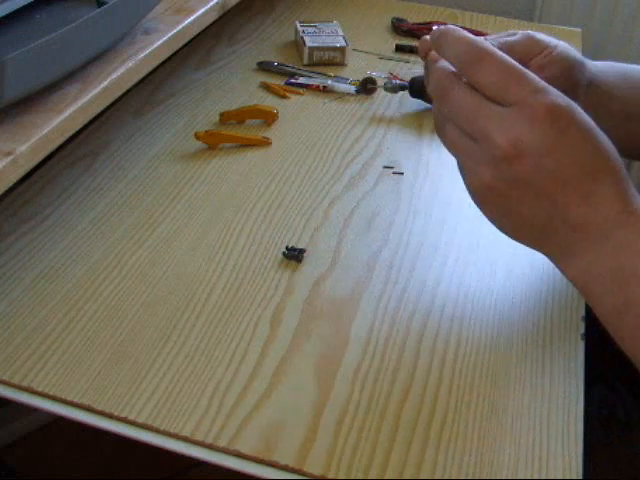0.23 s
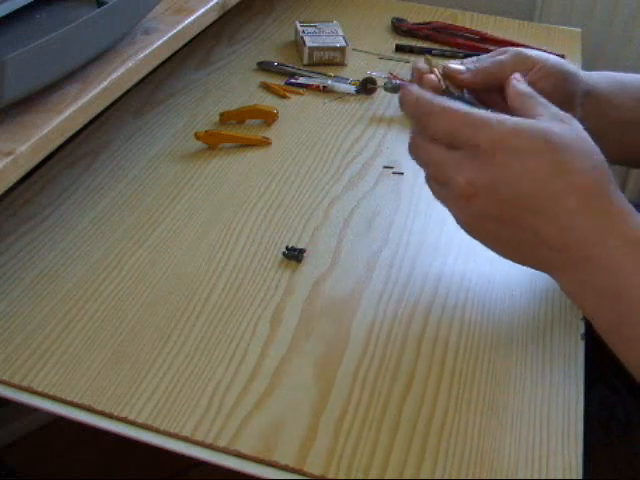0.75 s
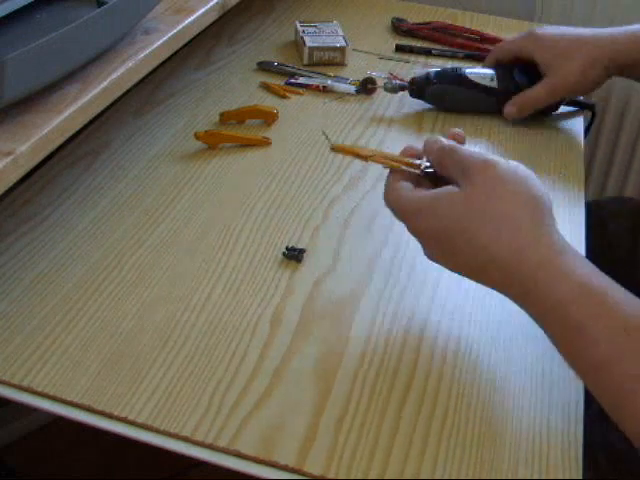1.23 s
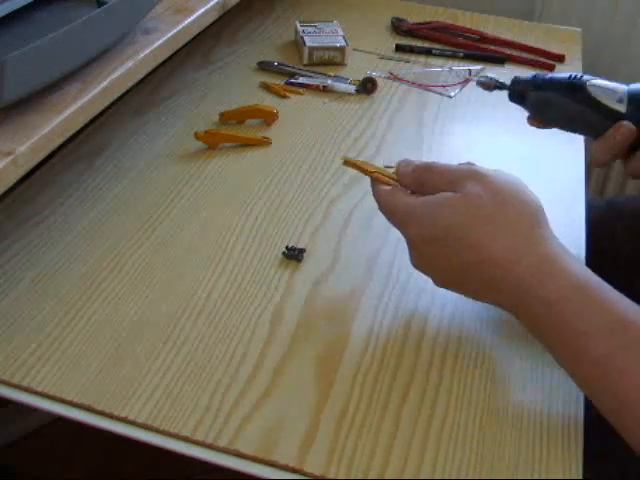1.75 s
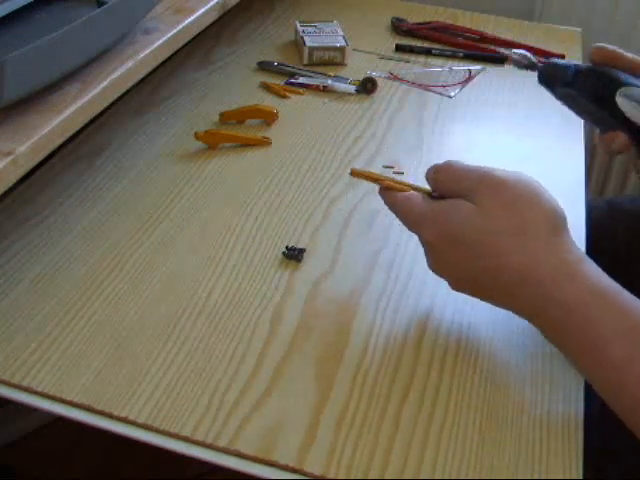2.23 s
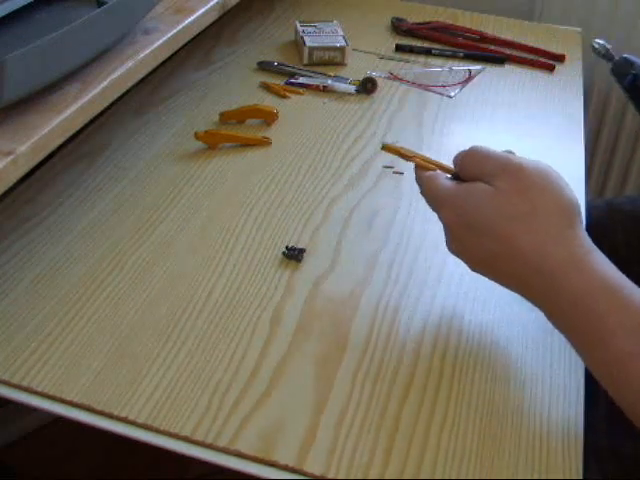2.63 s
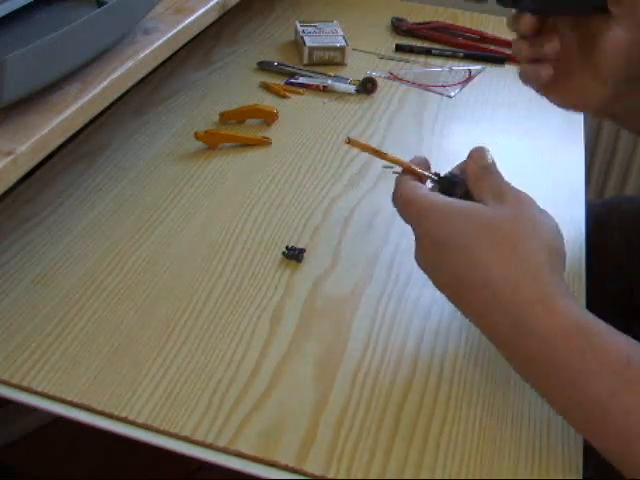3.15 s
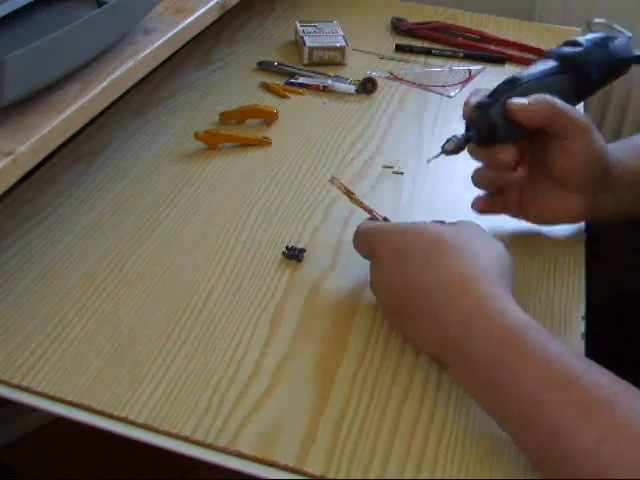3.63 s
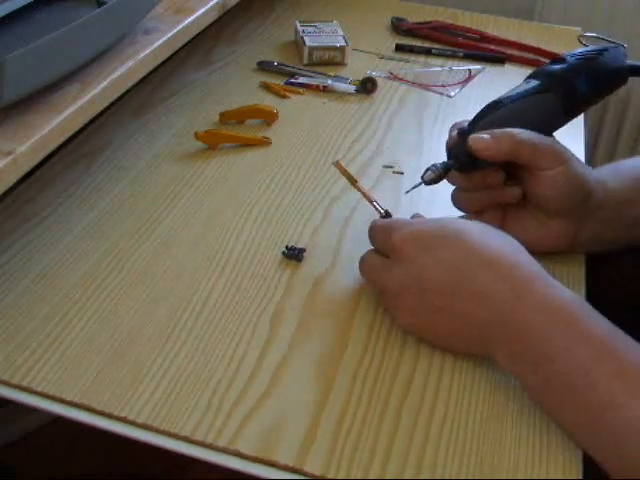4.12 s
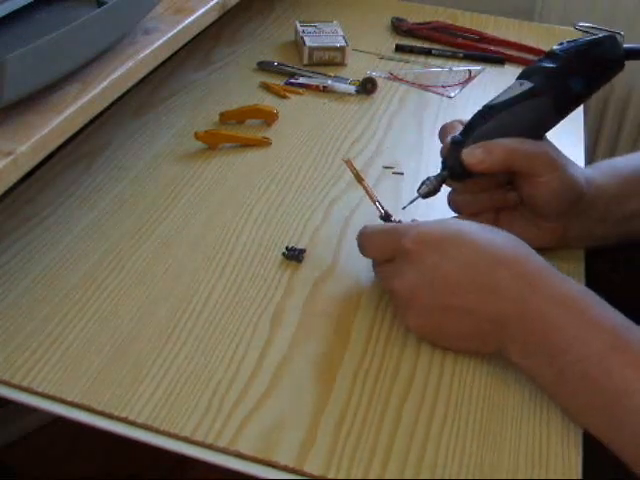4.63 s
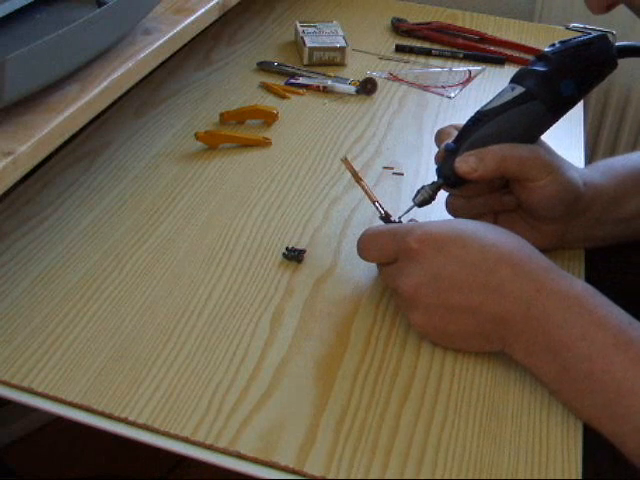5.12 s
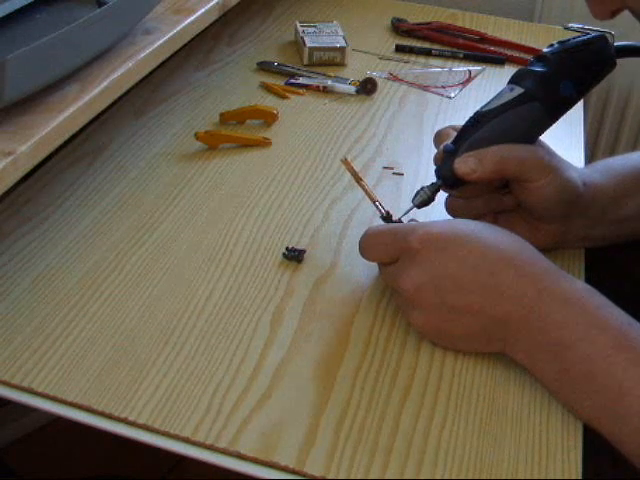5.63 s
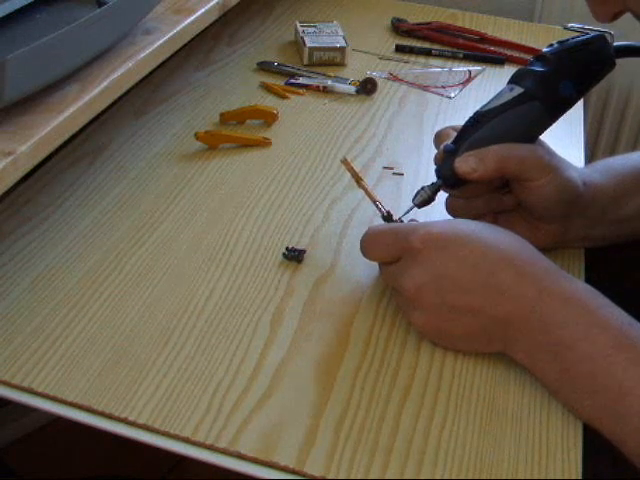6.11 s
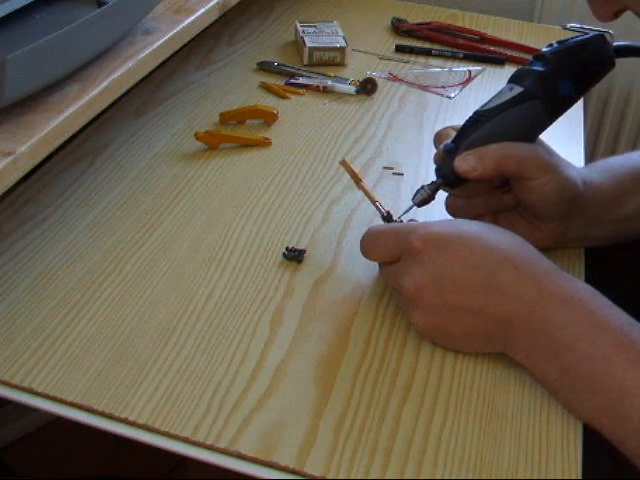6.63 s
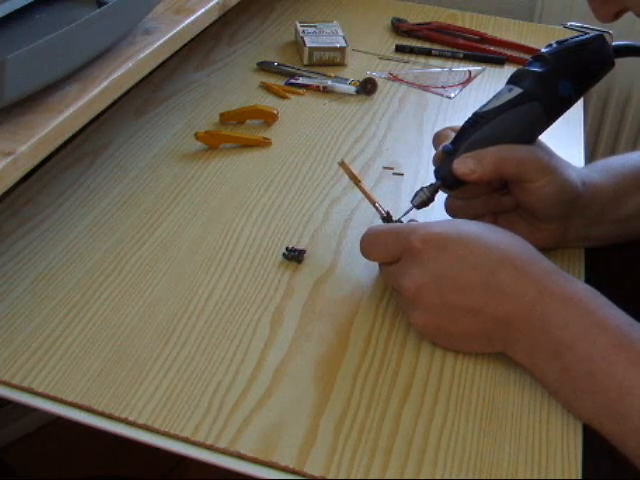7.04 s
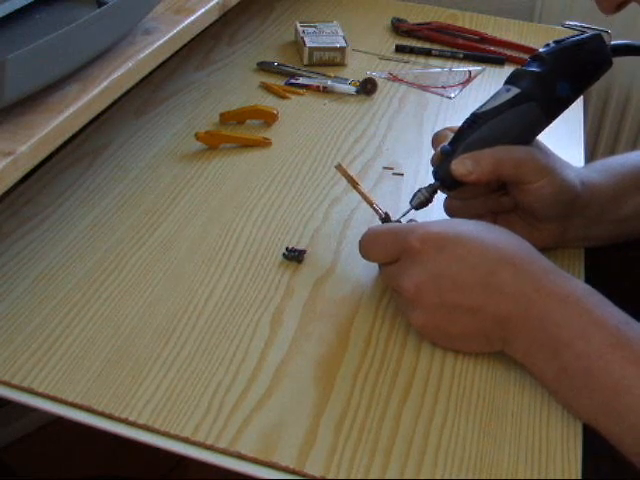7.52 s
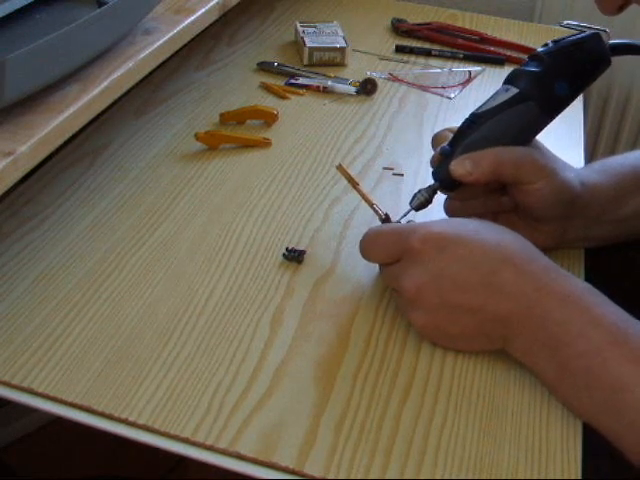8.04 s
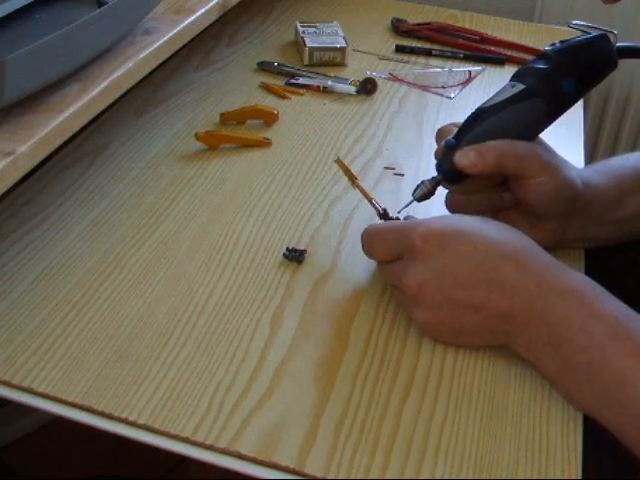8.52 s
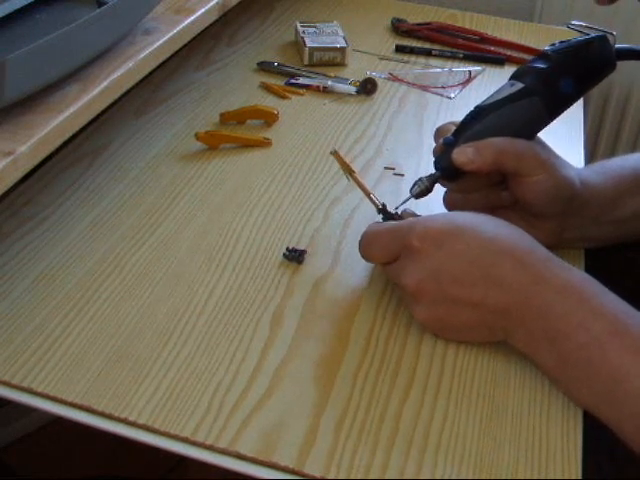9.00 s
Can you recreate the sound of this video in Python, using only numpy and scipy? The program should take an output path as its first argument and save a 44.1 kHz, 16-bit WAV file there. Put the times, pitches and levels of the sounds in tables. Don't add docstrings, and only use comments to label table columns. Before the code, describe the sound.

At a wooden desk, faint finger squeaks and a few light knocks sit over soft microphone hiss. A small rotary tool clicks on and its whine climbs quickly to a steady, airy high pitch. After a few seconds the bit touches a small part with fine hissing grazes, then harder buzzing, scraping presses that drag the pitch down. Between bites it recovers and ends running free. Close, plain mono camera microphone in a small room.

```python
import sys
import numpy as np
from scipy import signal
from scipy.fft import rfft, irfft, next_fast_len
from scipy.io import wavfile
from scipy.ndimage import uniform_filter1d

SR = 44100
rng = np.random.default_rng(int(sys.argv[2]) if len(sys.argv) > 2 else 0)


def gain_from_db(level_db):
    decades = np.asarray(level_db, float) / 20
    return 10 ** decades


def unload_audio(sound):
    columns = np.transpose(np.atleast_2d(sound))
    steps = np.round(np.clip(columns, -1, 1) * 32767)
    wavfile.write(sys.argv[1], SR, steps.astype(np.int16))


N = 408366
T = np.arange(N) / SR
CONTROL_STEP = 64
TOP_HZ = 531.8
CAGE = .3762
DEEP_DRAG = 130
TONE_LIMIT_HZ = 15600

# start_s, end_s, chips_db, wobble_db, scrape_db
TOUCHES = [(5.62, 5.65, -37, -65, -57), (5.68, 5.74, -33, -65, -52), (5.9, 5.97, -30, -63, -49),
           (6.0, 6.04, -25.5, -51.5, -54), (6.23, 6.31, -36.5, -63, -53), (6.43, 6.53, -27.5, -61, -46),
           (6.54, 6.68, -38, -51, -47.5), (6.69, 6.725, -26.5, -46, -42.5), (6.96, 7.03, -24.5, -49, -48),
           (7.04, 7.19, -22, -41.5, -47), (7.2, 7.26, -21.5, -45, -44), (7.278, 7.3, -21, -44, -47),
           (7.31, 7.33, -26, -39.5, -49), (7.337, 7.355, -20.5, -36.5, -42), (7.37, 7.43, -35, -38, -59),
           (7.44, 7.515, -28, -46.5, -56), (7.53, 7.57, -29, -38, -54), (7.585, 7.61, -28.5, -40, -54),
           (7.62, 7.65, -24.5, -39, -50), (7.668, 7.692, -22.5, -33.5, -38),
           (8.0, 8.025, -21.5, -56, -37.5), (8.04, 8.06, -20, -43, -41), (8.075, 8.13, -27.5, -42.5, -57),
           (8.155, 8.2, -33.5, -32, -54), (8.22, 8.25, -36, -23.5, -46), (8.25, 8.275, -39, -35, -23),
           (8.293, 8.325, -32, -25, -18), (8.34, 8.355, -33.5, -35, -29), (8.37, 8.43, -38.5, -44, -43.5),
           (8.44, 8.455, -30, -42, -46), (8.882, 8.9, -28.5, -64, -39.5)]
# freq_hz, level_db (per Hz)
CHIPS = [(5000, -19.5), (7500, -2), (9000, 1.5), (10300, 5.5), (11300, 2), (12800, -1), (15500, -2)]


def evened(x):
    return x / np.sqrt(np.mean(x ** 2) + 1e-20)


def columns(rows, outside=None):
    s, *rest = np.transpose(rows)
    return [np.interp(T, s, c, outside, outside) for c in rest]


def spans(rows, rise_db_per_s, fall_db_per_s):
    t = T[::CONTROL_STEP]
    start, end, *levels = np.array(rows)[:, :, None].transpose(1, 0, 2)
    away_db = rise_db_per_s * np.maximum(start - t, 0) + fall_db_per_s * np.maximum(t - end, 0)
    return [np.interp(T, t, np.maximum((db - away_db).max(axis=0), -120)) for db in levels]


def swells(rows):
    t = T[::CONTROL_STEP]
    bells_db = sum(db * np.exp(-((t - s) / half_width_s) ** 2) for s, half_width_s, db in rows)
    return np.interp(T, t, bells_db)


def drift(rate_hz, t=T):
    knots = np.arange(-1, N / SR * rate_hz + 2) / rate_hz
    return 1.15 * np.interp(t, knots, rng.standard_normal(len(knots)))


def noise(spectrum, size=N, gate=1):
    padded = next_fast_len(size)
    hz = np.fft.rfftfreq(padded, 1 / SR)
    f, db = np.transpose(spectrum)
    colour = gain_from_db(np.interp(np.log(hz + 1), np.log(f), db))
    white = rng.standard_normal(size) * gate
    return evened(irfft(rfft(white, padded) * colour, padded)[:size])


def ring(hz, width_hz):
    b, a = signal.iirpeak(hz, hz / width_hz, SR)
    once = signal.lfilter(b, a, rng.standard_normal(N))
    return evened(signal.lfilter(b, a, once))


def resonate(x, hz, width_hz):
    carrier = np.exp(2j * np.pi * np.cumsum(hz * np.ones(len(x))) / SR)
    r = np.exp(-np.pi * width_hz / SR)
    base = signal.lfilter([(1 - r) ** 2], [1, -2 * r, r * r], x / carrier)
    return 2 * (carrier * base).real


def tone(turns, hz, order, db, waver_db, slip=1):
    slow = slice(None, None, CONTROL_STEP)
    level = gain_from_db(db[slow] + waver_db * drift(13.0, T[slow]))
    level = level * (order * hz[slow] < TONE_LIMIT_HZ)
    sine = np.cos(2 * np.pi * (order * turns + slip * rng.random()))
    return np.sqrt(2) * np.repeat(level, CONTROL_STEP)[:N] * sine


def shaft(drag):
    switch_s, step_s, pull_hz = 2.1127, .002, 534.35
    gain_per_s, gain_per_hz, gain_cap_hz = 1.989, .004045, 276
    warm_s, warm_gain = 7, 1.128
    t = np.arange(switch_s, N / SR + .01, step_s)
    hz = [0.]
    for s, load in zip(t, np.interp(t, T, drag)):
        behind_hz = pull_hz - hz[-1]
        warm = warm_gain if s > warm_s else 1
        gain = gain_per_s * warm + gain_per_hz * min(behind_hz, gain_cap_hz)
        hz.append(min(hz[-1] + step_s * (gain * behind_hz - load), TOP_HZ))
    return np.maximum(np.interp(T, t, hz[:-1]), 30)


def motor_levels(hz, drag):
    # time_s, nearness_db, vents_db (extra brush hiss, brightest while the bit touches at 6.5
    # to 6.72 s), grip_db (whine let out)
    hold = [(2.12, 15.5, -9, -4), (2.3, 12.5, -2, 13), (2.45, 7.5, -2.5, -2), (2.8, 4.5, -3, 4),
            (3.1, 3.5, 1.5, 5.5), (3.35, 3.5, 0, 6.5), (3.5, 3, 8, 2), (3.65, 3.5, -2, 5.5),
            (4.1, 1.5, 0, 5), (4.4, 0.5, 4, 2), (4.8, -.5, 4.5, -2), (5.4, 0.9, 3, -3), (6.44, 1, 5.5, -2),
            (6.5, -4, 14, -3), (6.72, -4, 12, -3), (6.77, 0.5, 1, 0), (7.9, 1.5, -5, -1.5),
            (9.25, 2.1, -1, 3)]
    # time_s, half_width_s, gain_db
    swells_8 = [(2.27, .04, 22), (2.79, 0.045, 5), (2.92, 0.11, 9), (3.09, 0.089, 17), (3.33, 0.055, 0),
                (3.5, 0.081, 8), (4.25, 0.25, -1), (6.6, 0.082, -8)]
    # time_s, half_width_s, gain_db
    swells_16 = [(4.2, 0.054, 3.5), (6.5, 0.28, -12), (8.05, .05, 4)]
    # time_s, half_width_s, gain_db
    swells_slots = [(2.75, 0.13, 8.6), (3.1, 0.053, 6.5), (3.5, 0.049, 6.3), (3.8, 0.048, 5.3),
                    (4.1, .06, 4), (5.7, .1, 7.4), (6.6, .12, 5), (7.15, 0.21, 11), (7.55, .1, 6),
                    (7.9, 0.15, 14), (8.2, 0.046, 8), (9.0, 0.27, 10)]
    near, bright, grip = columns(hold)
    missing = 1 - hz / TOP_HZ
    choke = np.clip(drag / 250, 0, 1)
    chips = np.clip((spans(TOUCHES, 180, 200)[0] + 42) / 10, 0, 1)
    labour_db = chips * np.clip(drag / DEEP_DRAG, 0, 1)
    air_db = -34.5 + near + labour_db - 33.5 * missing
    brush_db = -35 + near + bright + 2.6 * labour_db - 20.5 * missing
    eight_db = -.5 + 0.59 * grip + swells(swells_8) + 0.45 * labour_db - 18 * choke - 118 * missing
    sixteen_db = -.6 + 0.45 * grip + swells(swells_16) - 7 * choke - 98 * missing
    slots_db = -3.5 + 0.92 * grip + swells(swells_slots) - 31 * missing
    other_db = 1 + grip - 4.5 * labour_db - 90 * missing
    return air_db, brush_db, eight_db, sixteen_db, slots_db, other_db


def beside(turns, hz, order, full_db, slow_db, db, count):
    below = np.clip((525 - hz) / 35, 0, 1)
    out = np.zeros(N)
    for j, (full, slow) in enumerate(zip(full_db, slow_db), -count):
        level_db = full + below * (slow - full) + db
        out += tone(turns, hz, order + j * CAGE, level_db, 2.4, slip=0.43)
    return out


def commutator_whine(turns, hz, eight_db, sixteen_db):
    fan_8 = [-58, -53, -45, -43, -38.5, -39.5, -50, -57]
    slow_8 = [-58, -51, -42, -44, -42, -42, -42.5, -43]
    fan_16 = [-76, -50, -42.5, -38.5, -33.5, -40, -45]
    slow_16 = [-80, -62, -47, -37.5, -36.5, -35, -36]
    out = beside(turns, hz, 8., fan_8, slow_8, eight_db, count=2)
    return out + beside(turns, hz, 16., fan_16, slow_16, sixteen_db, count=4)


def shaft_orders(turns, hz, slots_db, other_db):
    # order, level_db (rms)
    upper_orders = [(18, -48), (18.79, -49), (19, -52), (20, -45.5), (21, -48), (22, -47), (23, -46),
                    (23.23, -53), (24, -40), (25, -44.5), (25.16, -50), (26, -45.5), (27, -37.5),
                    (28, -39.5), (28.18, -45), (29, -39.5), (30, -48), (31, -54), (32, -49)]
    # order, level_db (rms)
    hum = [(1, -58), (2, -59.5), (2.554, -56)]
    # time_s, half_width_s, gain_db
    swells_18 = [(3.7, .7, 4.7)]
    # time_s, half_width_s, gain_db
    swells_top = [(3.6, 0.73, -5)]
    low_db, top_db = swells(swells_18), swells(swells_top)
    flicker_db = 2.2 + 2.5 * (hz[::CONTROL_STEP] < 529)
    out = np.zeros(N)
    for k, db in upper_orders:
        if k % 8 == 0:
            out += tone(turns, hz, k, db + slots_db, 1.3)
            continue
        swell_db = low_db if k == 18 else top_db if k > 26 else 0
        out += tone(turns, hz, k, db + other_db + swell_db, flicker_db)
    for k, db in hum:
        out += tone(turns, hz, k, db + 110 * np.log10(hz / 531), 1.8)
    return out


def air_and_brushes(turns, air_db, brush_db):
    # freq_hz, level_db (per Hz)
    air_colour = [(120, -58), (200, -29), (528, -19.5), (1170, -14.5), (1330, -12), (3690, -3), (4760, -5),
                  (6400, -4.5), (8310, -9), (9000, -6), (11700, -22), (19800, -120)]
    # freq_hz, level_db (per Hz)
    brush_colour = [(5000, -35.5), (7000, -31), (8300, -4.5), (9500, -12), (11200, -8), (12900, -2.5),
                    (14200, -6), (15500, -7)]
    beat = 1 + 0.14 * np.cos(2 * np.pi * turns) + 0.01 * np.cos(2 * np.pi * CAGE * turns)
    air = gain_from_db(air_db + 1.04 * drift(13.0)) * noise(air_colour, gate=beat)
    return air + gain_from_db(brush_db + 1.9 * drift(8.0)) * noise(brush_colour, gate=beat)


def brush_bounce(hz, brush_db):
    # freq_hz, gain_db
    flare = [(1500, -14), (3900, -24), (4400, -3.5), (4850, 2.5), (5450, -3.5), (6100, 2), (8700, 3.5),
             (11000, 6.5), (13800, 13.5)]
    change = uniform_filter1d(np.gradient(hz), 2000) * SR / 450
    bounce = np.clip(change, 0, 1) + np.clip(-change, 0, 1)
    bounce = uniform_filter1d(bounce, 2500)
    bounce = np.maximum(bounce, np.clip((340 - hz) / 40, 0, 1))
    out = np.zeros(N)
    for order, db in [(16, 2.5), (24, -2.0), (32, -8.0), (40, -12.5)]:
        band_hz = np.minimum(order * hz, 15900)
        band = evened(resonate(rng.standard_normal(N), band_hz, 850.))
        out += gain_from_db(brush_db + db + np.interp(band_hz, *np.transpose(flare))) * bounce * band
    return out


def housing(air_db):
    # freq_hz, width_hz, level_db
    shell = [(2312, 360, -14), (3900, 320, -32), (4820, 200, -12.5), (5900, 550, -18), (1330, 150, -37.5)]
    # time_s, ring_db, chirp_db (bearing)
    starting = [(2.12, -60, -48), (2.17, -48, -37.5), (2.24, -42, -39), (2.28, -37.5, -55),
                (2.36, -36.5, -60), (2.44, -42, -58), (2.47, -46, -44), (2.51, -59, -65), (2.7, -62, -70)]
    ring_db, chirp_db = columns(starting, -120)
    rings = [gain_from_db(db) * ring(f, w) for f, w, db in shell]
    out = gain_from_db(air_db) * sum(rings)
    out += gain_from_db(ring_db + 8.5) * (rings[0] + rings[2] + 3 * rings[4])
    return out + gain_from_db(chirp_db + 27.0) * rings[1]


def motor(turns, hz, drag):
    air_db, brush_db, eight_db, sixteen_db, slots_db, other_db = motor_levels(hz, drag)
    out = commutator_whine(turns, hz, eight_db, sixteen_db)
    out += shaft_orders(turns, hz, slots_db, other_db)
    out += air_and_brushes(turns, air_db, brush_db)
    out += brush_bounce(hz, brush_db)
    out += housing(air_db)
    return out * np.clip((T - 2.11) / 0.031, 0, 1)


def strikes(turns, hz, count):
    # freq_hz, level_db
    strike_colour = [(1400, 3), (2000, 3), (2650, -9), (3450, 6), (4400, 1), (5800, -8), (10200, 0),
                     (15500, -5)]
    at = np.arange(len(hz))
    coarse = np.arange(0, len(hz) + 700, 700)
    out = np.zeros(len(hz))
    for k, flutter in enumerate(rng.standard_normal((count, len(coarse))), 3):
        depth_db = min(1.5 + .3 * k, 5)
        db = np.interp(k * hz, *np.transpose(strike_colour)) + depth_db * np.interp(at, coarse, flutter)
        out += gain_from_db(db) * (k * hz < TONE_LIMIT_HZ) * np.cos(2 * np.pi * (k * turns + rng.random()))
    return out


def wobble(turns, hz, drag, first_db, force_db, judder_db):
    shallow_db = -13.5 * np.clip(1 - drag / DEEP_DRAG, 0, 1)
    second_db = np.minimum(-43.5 + 0.47 * (first_db + 38) + shallow_db, first_db + 5)
    strike_db = -40 + shallow_db - 19 * (1 - hz / TOP_HZ)
    strike_db += 0.3 * force_db + 2 * np.minimum(force_db + 14.5, 0) + 0.25 * judder_db
    out = tone(turns, hz, 1, first_db, 0.22) + tone(turns, hz, 2, second_db, 0.79)
    contact = strike_db > -70
    out[contact] += gain_from_db(strike_db[contact]) * strikes(turns[contact], hz[contact], count=34)
    return out


def chips_and_scrape(turns, chip_db, scrape_db):
    # freq_hz, width_hz, level_db
    shank = [(10150, 710, -8.5), (12100, 450, -7.5), (13150, 400, -6)]
    # freq_hz, level_db (per Hz)
    scrape_colour = [(150, -62), (400, -7), (500, -5.5), (1200, 1), (2100, -2), (4900, 0), (10600, -11.5),
                     (15500, -31)]
    pulse = 1 + .5 * np.cos(2 * np.pi * turns)
    grains = gain_from_db(1.0 * drift(400.) + 2.0 * drift(45.))
    singing = grains * sum(gain_from_db(db) * ring(f, w) for f, w, db in shank)
    chips = evened(noise(CHIPS, gate=pulse * grains) + singing)
    scrape = noise(scrape_colour, gate=pulse ** 3 * grains) + gain_from_db(-9.0) * ring(5120, 160)
    return gain_from_db(chip_db) * chips + gain_from_db(scrape_db) * scrape


def cutting(turns, hz, drag):
    # time_s, half_width_s, gain_db
    judders = [(7.05, .02, 4), (7.15, 0.01, 5), (7.195, 0.0064, 9), (7.215, 0.0059, 2), (7.235, 0.0058, 7),
               (7.26, 0.0067, 8), (7.287, 0.0086, 9), (7.322, 0.0065, 12), (7.345, 0.017, 11),
               (7.44, .015, 0), (7.56, .015, 6), (8.012, .008, 8), (8.05, 0.0078, 7.5)]
    # freq_hz, width_hz, gain_db
    board = [(270, 7.5, -9), (347, 22, 3), (554, 23.4, 9)]
    # freq_hz, width_hz, level_db
    chatter = [(1440, 20, -44), (1960, 20, -42.5), (3480, 70, -37.5)]
    # time_s, level_db
    bite = [(6.96, -40), (7.0, -5), (7.15, -2), (7.3, -5), (7.37, -6), (7.41, -36), (7.99, -43),
            (8.01, -4.5), (8.08, -3), (8.12, -36)]
    chip_db, first_db, scrape_db = spans(TOUCHES, 584, 479)
    force_db = np.maximum(chip_db, scrape_db) + 22
    judder_db = swells(judders)
    out = wobble(turns, hz, drag, first_db, force_db, judder_db)
    out += chips_and_scrape(turns, chip_db, scrape_db)
    out += sum(gain_from_db(db) * signal.lfilter(*signal.iirpeak(f, f / w, SR), out) for f, w, db in board)
    flex = sum(gain_from_db(db) * ring(f, w) for f, w, db in chatter)
    return out + gain_from_db(columns(bite, -120)[0] + judder_db) * flex


def snaps():
    # time_s, peak_db
    snap_rows = [(7.4393, -14), (7.9981, -13), (8.3049, -18), (8.4495, -18), (8.8855, -15)]
    out, t = np.zeros(N + SR), np.arange(600) / SR
    for s, db in snap_rows:
        tick = noise(CHIPS, len(t)) * np.exp(-t / .0012)
        out[round(s * SR):][:len(t)] += gain_from_db(db - 6.0) * tick
    return out[:N]


def knocks():
    # time_s, peak_db, desk_db (share), tick_t60_s
    knock_rows = [(1.127, -40, -7, 0.09), (1.3454, -26, 8, 0.11), (1.4266, -29, 9.5, 0.2),
                  (1.453, -46, 21, 0.1), (1.769, -24.5, -30, 0.1)]
    # freq_hz, level_db, t60_s
    desk_modes = [(272, -12.5, 0.26), (339, -10.5, 0.37), (586, -4, 0.17), (790, 1.5, 0.046),
                  (1050, -7, .06), (1530, -8, 0.054), (2630, -9.5, 0.084)]
    # freq_hz, level_db (per Hz)
    tick_colour = [(1500, -32), (3000, -10), (5000, 4.5), (7000, 1), (11000, -2), (15500, -7)]
    out, t = np.zeros(N), np.arange(SR // 4) / SR
    for s, db, desk_db, tick_t60_s in knock_rows:
        decay = 0.59 * np.exp(-t / 0.00073) + 0.23 * gain_from_db(-60 * t / tick_t60_s)
        tick = noise(tick_colour, len(t)) * decay
        desk = np.zeros(len(t))
        for f, mode_db, t60_s in desk_modes:
            desk += gain_from_db(mode_db - 60 * t / t60_s) * np.sin(2 * np.pi * f * t + 3 * rng.random())
        desk *= 1 - np.exp(-t / 0.0015)
        out[round(s * SR):][:len(t)] += gain_from_db(db) * (tick + 0.12 * gain_from_db(desk_db) * desk)
    return out


def squeaks():
    # start_s, length_s, pitch_hz, width_hz, level_db
    squeak_rows = [(0, 0.02, 4870, 120, -33.5), (0.022, 0.11, 4920, 80, -51), (0, 0.059, 6020, 200, -50),
                   (.113, 0.068, 7320, 200, -48.5), (.114, 0.091, 6330, 300, -53),
                   (.132, .065, 3700, 80, -63), (0.18, 0.085, 8780, 250, -49), (.2, .044, 9500, 500, -50),
                   (0.15, 0.1, 11300, 5000, -49), (0.303, .055, 12200, 4000, -53),
                   (0.26, 0.043, 8100, 300, -54), (.271, .055, 11600, 300, -56),
                   (0.292, .03, 6400, 150, -57), (.317, 0.052, 5940, 120, -57),
                   (0.377, .06, 7200, 400, -58), (0.534, .09, 7950, 700, -53),
                   (0.993, .093, 7840, 1200, -55), (1.557, .048, 8670, 300, -55),
                   (1.846, 0.075, 3380, 160, -51), (1.898, 0.059, 3080, 200, -54),
                   (1.987, 0.074, 4280, 90, -44.5), (2.034, 0.077, 4230, 70, -53),
                   (5.062, .05, 4980, 120, -35)]
    out = np.zeros(N + SR)
    for s, length_s, hz, width_hz, db in squeak_rows:
        size = round(length_s * SR)
        arch_hz = 0.81 * min(width_hz, 200) * (np.hanning(size) - .5)
        whistle = resonate(rng.standard_normal(SR // 4)[:size], hz + arch_hz, width_hz)
        out[round(s * SR):][:size] += gain_from_db(db) * evened(whistle) * signal.windows.tukey(size, .6)
    return out[:N]


def room(x):
    t = np.arange(SR // 4) / SR
    tail = noise([(200, -14.0), (3000, 6.5), (15000, -4.0)], len(t))
    tail = tail * gain_from_db(-60 * t / 0.25) * (t > .004)
    return signal.oaconvolve(x, tail / np.linalg.norm(tail))[:N]


def rumble():
    # start_s, end_s, level_db
    rumble_rows = [(0, 2.17, -70), (3.02, 3.62, -72), (3.75, 4.12, -64), (6.57, 6.67, -57), (6.98, 7.37, -60),
                   (7.68, 7.72, -69), (8.015, 8.045, -63), (9.17, 9.3, -66)]
    level_db = np.maximum(spans(rumble_rows, 220, 220)[0], -101)
    return gain_from_db(level_db) * noise([(14, -30), (32, 1), (60, -7), (90, -3.0), (200, -70)])


def hiss():
    # freq_hz, level_db (per Hz)
    hiss_colour = [(56, -67), (95, -6.5), (450, -7.5), (523, -12), (569, -8), (950, -6.5), (1550, -10),
                   (1690, -8.5), (15500, -11.5)]
    return gain_from_db(-50) * noise(hiss_colour)


def scene():
    # time_s, drag_hz_per_s
    drag_curve = [(6.35, 0), (6.7, 42), (6.8, 0), (6.95, 7), (7.15, 104), (7.3, 201), (7.48, 464),
                  (7.62, 701), (7.67, 349), (7.71, 0), (8.01, 0), (8.1, 579), (8.26, 1188), (8.29, 950),
                  (8.33, 1000), (8.36, 1750), (8.39, 1480), (8.43, 1218), (8.45, 0)]
    drag = columns(drag_curve)[0]
    hz = shaft(drag)
    unsteady = .0003 + .014 * np.clip(1 - hz / 500, 0, .3)
    turns = np.cumsum(hz * (1 + unsteady * drift(70.))) / SR
    near = motor(turns, hz, drag) + cutting(turns, hz, drag) + snaps() + knocks() + squeaks()
    mono = near + gain_from_db(-13.5) * room(near) + rumble() + hiss()
    return np.array([mono, mono])


def roll_off(x):
    return signal.sosfilt(signal.butter(12, 16340, fs=SR, output="sos"), x)


def record(dry):
    limit = .62
    bent = limit * np.tanh(dry / limit)
    edge = signal.firwin(2047, 15460, window=("kaiser", 9), fs=SR)
    mix = signal.oaconvolve(bent, edge[None], "same") - .0034
    return roll_off(mix)


dry = scene()
out = record(dry)
unload_audio(out)
```